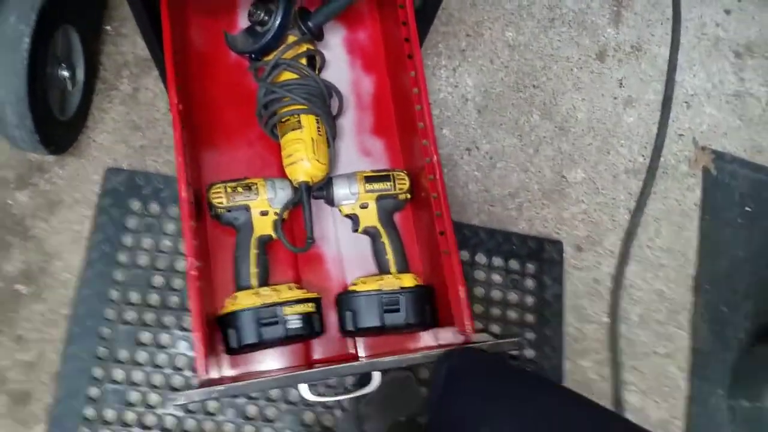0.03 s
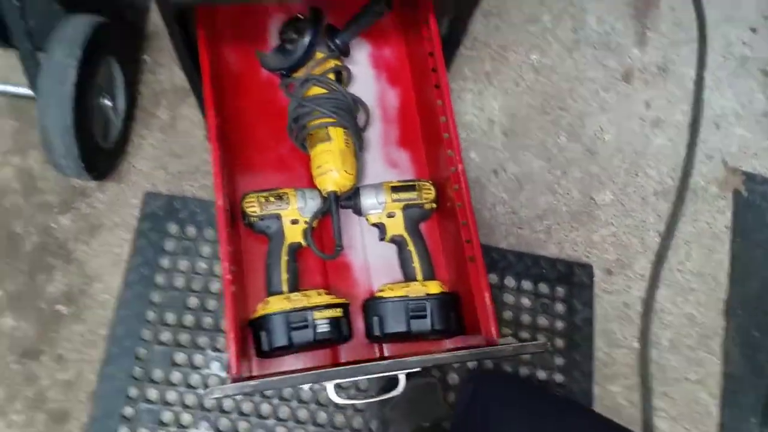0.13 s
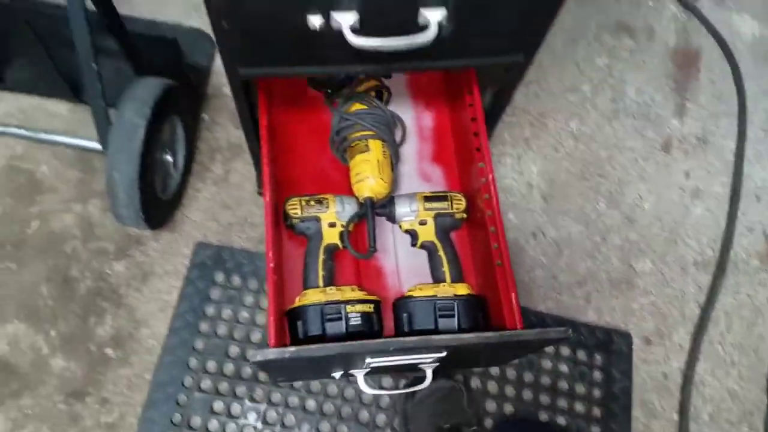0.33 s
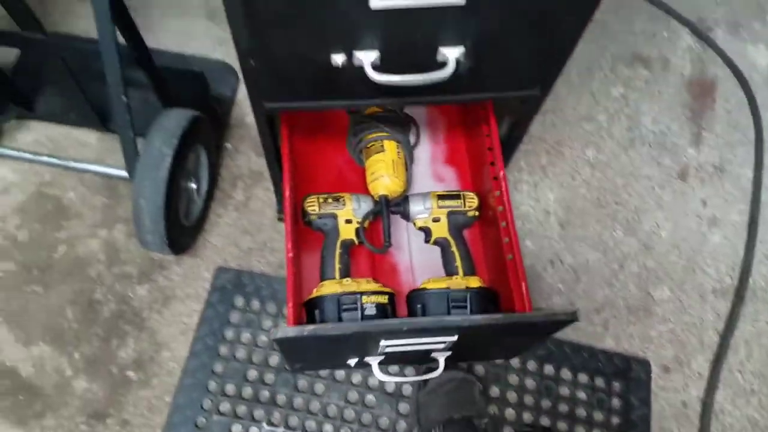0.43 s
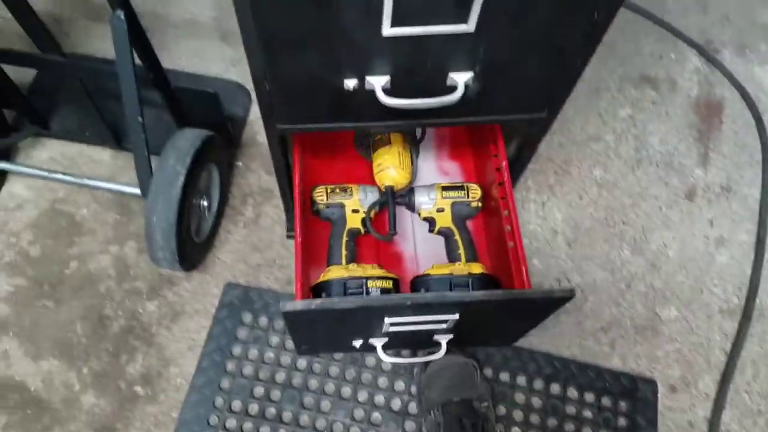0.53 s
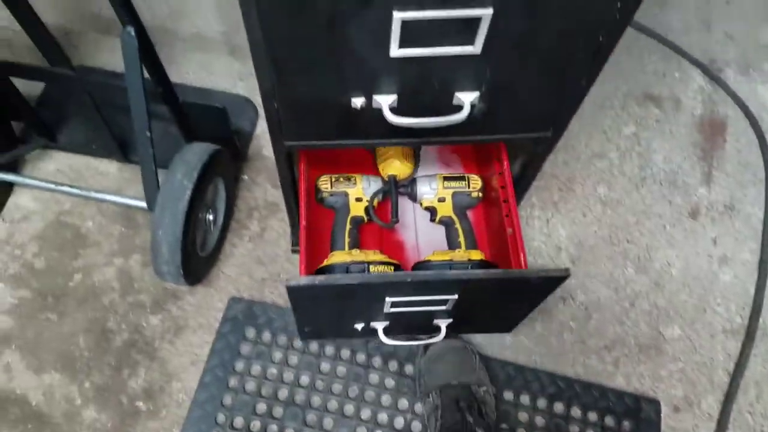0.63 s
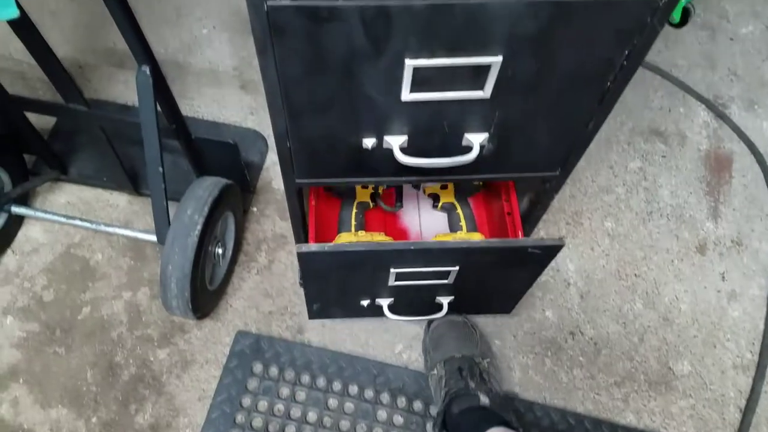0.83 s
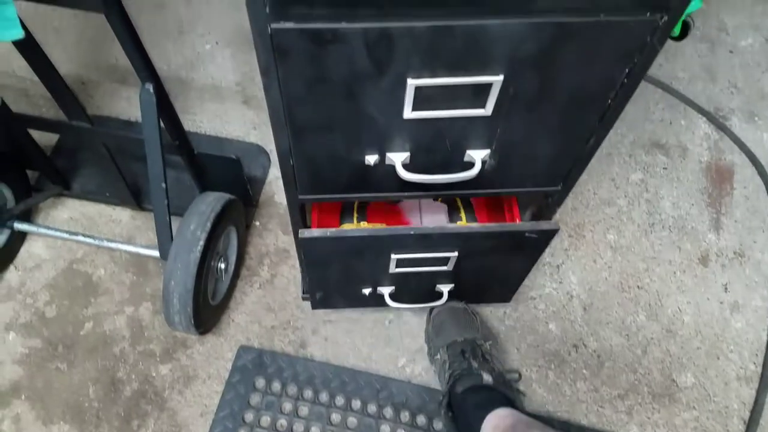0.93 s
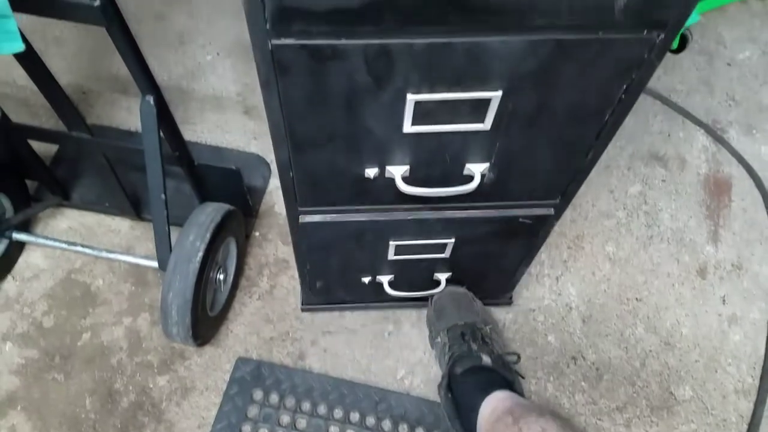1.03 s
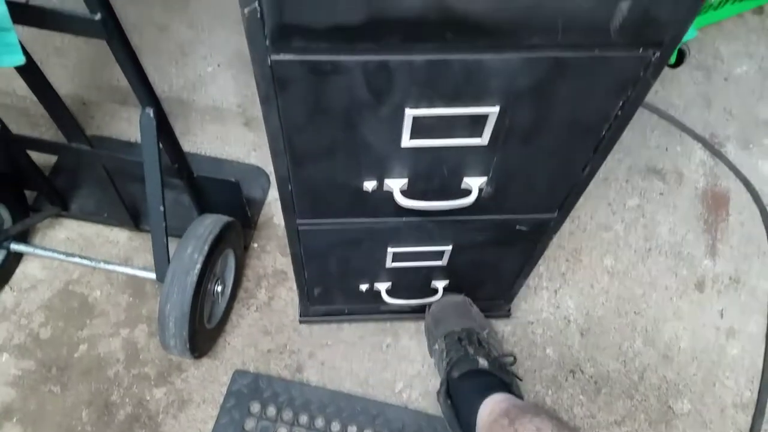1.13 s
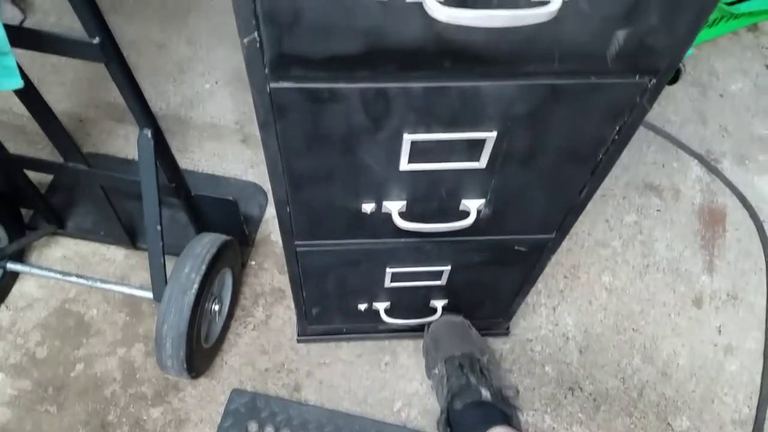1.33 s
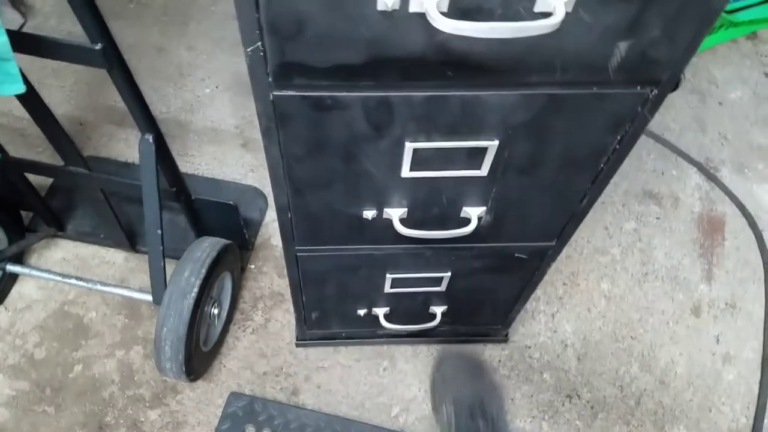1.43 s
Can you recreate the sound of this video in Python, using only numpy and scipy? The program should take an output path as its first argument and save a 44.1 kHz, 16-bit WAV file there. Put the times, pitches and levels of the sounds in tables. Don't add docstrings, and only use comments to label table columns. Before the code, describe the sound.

Heavy metal drawer rolls closed with knocks and tool rattle, then slams with a hollow clang.

```python
import sys
import numpy as np
from scipy import signal
from scipy.fft import rfft, irfft, next_fast_len
from scipy.io import wavfile
from scipy.ndimage import uniform_filter1d

SR = 44100
rng = np.random.default_rng(int(sys.argv[2]) if len(sys.argv) > 2 else 0)


def generate_wav(sig):
    pcm = np.round(np.clip(np.atleast_2d(sig).T, -1, 1) * 32767).astype(np.int16)
    wavfile.write(sys.argv[1], SR, pcm)


def decibels_to_gain(level_db):
    exponent = np.asarray(level_db, float) / 20
    return 10 ** exponent


N = 66150
PADDED = next_fast_len(N + 8192)

# frequency in Hz, level in dB, T60 in seconds.
BODY = [(86, -40, 0.26), (118.2, -7, 0.27), (161, -5.5, 0.075), (183, -4.5, 0.24), (251.2, -8.5, 0.85),
        (264, -6.5, 0.24), (296, -5.5, 0.16), (313, -2.5, 0.077), (395, -2.5, 0.04), (470.3, -5, 0.16),
        (599, -13, 0.15), (761, -4, 0.097)]


def rms_one(x):
    return x / np.sqrt(np.mean(x ** 2) + 1e-20)


def at_hz(points, hz):
    points_hz, values = np.transpose(points)
    return np.interp(np.log(np.maximum(hz, 1)), np.log(points_hz), values)


def colour(x, spectrum):
    gain = decibels_to_gain(at_hz(spectrum, np.fft.rfftfreq(PADDED, 1 / SR)))
    return irfft(rfft(x, PADDED) * rms_one(gain), PADDED)[:N]


def drift(rate_hz):
    r = np.exp(-2 * np.pi * rate_hz / SR)
    wander = signal.lfilter([1], [1, -2 * r, r * r], rng.standard_normal(N + SR))
    return rms_one(wander[SR:])


def ring(x, hz, t60_s):
    r = decibels_to_gain(-60 / (t60_s * SR))
    w = 2 * np.pi * min(hz, SR / 2.1) / SR
    return signal.lfilter([0, np.sin(w)], [1, -2 * r * np.cos(w), r * r], x + 1e-18)


def flex(rows, rise_s):
    out = np.zeros(N)
    for s, db, hz, t60_s in rows:
        a = int(s * SR)
        t = np.arange(min(N - a, int(t60_s * SR))) / SR
        swell = decibels_to_gain(db - 60 * t / t60_s) * (1 - np.exp(-t / rise_s))
        out[a:a + len(t)] += swell * np.sin(2 * np.pi * hz * t)
    return out


def contacts():
    contacts_per_s, spread_db, clump_db = 4000, 2.0, 1.5
    sizes = decibels_to_gain(spread_db * np.minimum(rng.exponential(1, N), 5)) * rng.choice([-1, 1], N)
    clicks = sizes * (rng.random(N) < contacts_per_s / SR)
    return rms_one(clicks * decibels_to_gain(clump_db * drift(23.3)))


def steady(x, window_s=0.09):
    return x / np.sqrt(uniform_filter1d(x ** 2, size=int(window_s * SR)) + .05)


def rolling():
    # time in seconds, vigour in dB, load on the rollers in dB.
    roll = [(0.0, -40, -9), (.15, -40, -1), (.3, -33.5, -4.5), (0.398, -30, -3.5), (.5, -31.5, -3.5),
            (.6, -33, -2.5), (.68, -33.5, -5), (0.758, -37, -13), (.83, -36, 1.5), (.9, -31.5, -22),
            (.96, -27, 0), (1.121, -25, -19)]
    # frequency in Hz, density in dB per Hz.
    panels = [(24, -42), (40, -60), (75, -10.5), (257, -8), (320, -7.5), (764, -12), (1010, -18),
              (2420, -21.5), (5000, -43.5), (6500, -61), (11000, -120)]
    # frequency in Hz, density in dB per Hz.
    grit_spectrum = [(2060, -4), (3500, -4), (5330, -11), (5900, -8.5), (15000, -10.5), (16000, -4)]
    stop_s, stop_db_per_s = 1.1144, 420
    body_db, body_follows, panel_db = -29, 0.6, 6.5
    grit_db, grit_follows = -47.5, 1.65

    t = np.arange(N) / SR
    s, vigour_db, load_db = np.transpose(roll)
    stop = -stop_db_per_s * np.maximum(t - stop_s, 0)
    vigour = np.interp(t, s, vigour_db)
    load = np.interp(t, s, load_db) + stop

    shake = contacts()
    modes = [decibels_to_gain(db) * rms_one(ring(shake + contacts(), hz, t60_s)) for hz, db, t60_s in BODY]
    body = steady(rms_one(sum(modes)))
    out = decibels_to_gain(body_db + body_follows * (vigour + 33) + load) * body
    out = out + decibels_to_gain(panel_db + vigour + stop) * steady(colour(shake, panels))

    scratch = rng.standard_normal(N) * decibels_to_gain(2.0 * drift(51)) + 0.31 * shake
    grit_level = decibels_to_gain(grit_db + grit_follows * (vigour + 36.5) + stop)
    return out + grit_level * colour(scratch, grit_spectrum)


def knocks():
    # start in seconds, peak in dB, body share in dB, sharpness in dB.
    knock_rows = [(0.004, -21, 3.5, 7), (0.089, -21.5, -23, 6.5), (0.162, -29, 17, -9),
                  (0.216, -11, 5.5, -3.5), (0.261, -27, -8, -10), (0.326, -12, -9, 0.5),
                  (0.361, -15.5, -23, 5.5), (0.418, -16, 2.5, -10), (0.456, -11.5, 8.5, -14),
                  (0.526, -15, 12.5, -17), (0.6, -16.5, -5, 6.5), (0.634, -36, -26, -9),
                  (0.662, -36, 3, -18), (0.743, -16.5, 8.5, -9), (0.861, -8, 0, -2), (0.896, -18, 14.5, -3),
                  (0.925, -13.5, -5, 6), (0.948, -7, 1, 2), (0.973, -1, -8, -2), (0.999, -5.5, -7, -3),
                  (1.033, -1, 4, -18), (1.043, -10, -14, 2.5), (1.059, -8.5, -9, 3), (1.097, -13.5, 2, -5),
                  (1.127, -18, 1, 2.5), (1.157, -14.5, 12.5, 1.5), (1.199, -16, 0, -7),
                  (1.247, -23.5, 9.5, -9), (1.29, -28, -14, -4), (1.439, -34, -2, -13)]
    body_gain_db, panel_gain_db, soft_hz = -20.5, -11, 910
    mode_spread_s = 0.00591
    rattle_t60_s, rattle_rise_s = 0.047, 0.0058

    s, db, body_db, sharp_db = np.transpose(knock_rows)
    at = (s * SR).astype(int)
    chance_db = rng.normal(0, 4.3, (len(s), len(BODY)))
    late = (rng.random(chance_db.shape) * mode_spread_s * SR).astype(int)
    body = np.zeros(N)
    for k, (hz, mode_db, t60_s) in enumerate(BODY):
        push = np.zeros(N)
        push[at + late[:, k]] = decibels_to_gain(db + body_db + body_gain_db + mode_db + chance_db[:, k])
        body += ring(push, hz, t60_s * 0.57)
    body = signal.sosfilt(signal.butter(1, soft_hz, fs=SR, output="sos"), body)

    hits = np.zeros(N)
    hits[at] = decibels_to_gain(db + sharp_db + panel_gain_db)
    rise = np.exp(-1 / (rattle_rise_s * SR))
    fall = decibels_to_gain(-60 / (rattle_t60_s * SR))
    swell = signal.lfilter([1 - rise], np.convolve([1, -rise], [1, -fall]), hits)
    rattle = swell * (.5 * contacts() + rng.standard_normal(N))
    return body + colour(rattle, [(150, 11), (600, 9.5), (1100, 6.5), (2500, 6), (4500, -8.0), (16000, -41)])


def slam():
    # start in seconds, level in dB.
    blow_rows = [
        (1.0335, -10),
        (1.0365, -13),
        (1.0415, -6),
        (1.0487, 0),
        (1.0605, -13),
        (1.065, -15),
        (1.101, -17),
    ]
    # frequency in Hz, level in dB, T60 in seconds.
    plate = [(420, -4, .04), (511, -5, .05), (640, -5, .035), (894, -3, .05), (1000, -4, .04),
             (1130, -5, .04), (1432, -9, .05), (1873, -10, .05), (2100, -10, .05)]
    s, db = np.transpose(blow_rows)
    chance_db = rng.normal(0, 1.3, (len(s), len(plate)))
    signs = (-1) ** np.arange(1, len(s) + 1)
    out = np.zeros(N)
    for k, (hz, mode_db, t60_s) in enumerate(plate):
        push = np.zeros(N)
        push[(s * SR).astype(int)] = decibels_to_gain(db + mode_db + chance_db[:, k] - 7) * signs
        out += ring(push, hz, t60_s)
    return signal.sosfilt(signal.butter(2, 2500, fs=SR, output="sos"), out)


def thuds():
    # start in seconds, level in dB, frequency in Hz, T60 in seconds.
    heavy = [
        (.17, -21, 108.7, .2),
        (0.69, -21.5, 187, .25),
        (.36, -26, 95, 0.22),
        (0.47, -24, 118.3, 0.22),
        (.99, -10, 118, 0.28),
        (0.783, -12.5, 121, 0.15),
        (0.898, -12, 108, 0.29),
        (1.1, -24, 84, 0.052),
        (1.201, -7, 87, 0.096),
        (1.437, -34.5, 107, 0.38),
    ]
    # start in seconds, peak in dB, frequency in Hz.
    bumps = [(0.126, -19, 262), (0.163, -21.5, 262), (0.196, -35, 264), (0.232, -24, 229.6),
             (0.254, -19, 275.3), (0.297, -19, 269), (0.347, -27, 252), (0.389, -20, 267),
             (0.421, -17, 269), (0.461, -16, 264), (0.5, -18.5, 227.5), (0.548, -18, 243),
             (0.602, -10, 257.4), (0.629, -17, 264), (0.678, -23, 260), (0.7, -17.5, 280),
             (0.747, -10.5, 274.8), (0.816, -19.5, 297), (0.869, -12.5, 263.5), (0.919, -14, 259),
             (0.948, -17.5, 293), (0.986, -16, 292), (1.033, -20, 228), (1.061, -13.5, 300),
             (1.108, -16.5, 306.2), (1.161, -17.5, 277.6), (1.214, -31, 308)]
    # start in seconds, peak in dB, frequency in Hz.
    sways = [(0.105, -35, 164), (0.155, -24, 186), (0.189, -17.5, 158.5), (0.242, -29, 140),
             (0.302, -22, 140), (0.357, -16, 171), (0.401, -30, 156), (0.455, -27, 166), (0.512, -18, 172),
             (0.564, -14, 181), (0.745, -33, 182), (0.786, -24, 158), (0.851, -19, 171),
             (0.909, -14.5, 190.7), (1.023, -13.5, 187.8), (1.1, -22, 153), (1.237, -29, 139)]
    # start in seconds, level in dB, frequency in Hz, T60 in seconds.
    chimes = [(.475, -20.5, 488, 0.2), (.53, -24, 584.7, .4), (.975, -13.5, 934, 0.12),
              (.99, -17, 595, 0.17), (1.034, -21, 463, 0.13), (1.036, -17, 898.4, 0.19),
              (.943, -11.5, 272, 0.16), (1.054, -14.5, 301.5, 0.19), (1.099, -11, 305.2, .2),
              (1.157, -17, 284.7, 0.18), (1.038, -11, 1110, 0.062), (1.05, -23, 520.6, 0.16),
              (1.1, -19, 337.5, 0.2), (1.115, -16, 397.8, 0.19), (1.04, -29, 2190, .2),
              (1.04, -17, 1427, 0.17)]
    floor_t60_s, wall_t60_s = 0.2, 0.29
    answers = [(s, db - 3, hz, floor_t60_s) for s, db, hz in bumps]
    answers += [(s, db - 6.5, hz, wall_t60_s) for s, db, hz in sways]
    return flex(heavy, rise_s=0.022) + flex(answers, rise_s=0.0031) + flex(chimes, rise_s=0.0065)


def rubs():
    # peak time in seconds, peak in dB, length in seconds, whistle in Hz, whistle level in dB.
    rub_rows = [(0.088, -56.5, 0.038, 14400, -2), (0.168, -47.5, 0.081, 10300, -29),
                (0.28, -45, .03, 15200, -11), (0.328, -44, 0.021, 12200, -25), (0.405, -48, 0.026, 8200, 4),
                (0.407, -44.5, .025, 13500, 5), (0.463, -55, 0.018, 8500, -4),
                (0.533, -35.5, 0.031, 11900, -9.5), (.535, -57, .03, 7700, -7),
                (0.606, -52, 0.023, 13000, 0), (0.89, -61, .02, 6200, -6), (0.948, -50.5, 0.036, 6000, 8.5),
                (1.044, -36, 0.026, 14000, -2), (1.059, -34.5, .03, 12700, -14),
                (1.075, -26, 0.0063, 14800, 2), (1.081, -35, 0.034, 5260, -2)]
    rise_share, whistle_width_hz = 0.43, 700
    t, out = np.arange(N) / SR, np.zeros(N)
    bright = signal.butter(2, 4500, "high", fs=SR, output="sos")
    hiss = rms_one(signal.sosfilt(bright, rng.standard_normal(N) + .5 * contacts()))
    for s, db, length_s, hz, whistle_db in rub_rows:
        a, b = int(max(s - length_s, 0) * SR), int((s + 4 * length_s) * SR)
        u = np.maximum((t[a:b] - s) / (rise_share * length_s) + 1, 0)
        whistle = rms_one(ring(hiss[a:b], hz, 2.2 / whistle_width_hz))
        out[a:b] += decibels_to_gain(db) * u * np.exp(1 - u) * (hiss[a:b] + decibels_to_gain(whistle_db) * whistle)
    return out


def chatter():
    # centre in seconds, rms in dB, length in seconds, frequency in Hz.
    clumps = [(0.338, -42, 0.046, 1470), (0.373, -34.5, 0.05, 2370), (0.415, -31.5, 0.044, 770),
              (0.46, -37, .04, 700), (0.561, -35.5, .04, 2340), (0.57, -30, 0.037, 756),
              (0.603, -37.5, 0.053, 2440), (0.723, -39, 0.046, 2690), (0.783, -35, 0.061, 745),
              (1.044, -28, 0.018, 1010), (1.047, -30.5, 0.018, 1970)]
    ring_cycles = 27
    t, out = np.arange(N) / SR, np.zeros(N)
    clicks = contacts()
    for s, db, length_s, hz in clumps:
        a, b = int((s - 2 * length_s) * SR), int((s + 2 * length_s) * SR)
        swell = decibels_to_gain(db) * np.exp(-2 * ((t[a:b] - s) / length_s) ** 2)
        out[a:b] += swell * rms_one(ring(clicks[a:b], hz, ring_cycles / hz))
    return out


def echoes(t60_points):
    size, out = N // 2, 0
    edges_hz = 40 * 2 ** np.arange(0, 9.1)
    for low, high in zip(edges_hz, edges_hz[1:]):
        octave = signal.butter(2, [low, high], "band", fs=SR, output="sos")
        band = signal.sosfilt(octave, rng.standard_normal(size))
        t60_s = at_hz(t60_points, np.sqrt(low * high))
        out = out + band * decibels_to_gain(-60 * np.arange(size) / SR / t60_s) / np.sqrt(t60_s)
    return out / np.sqrt(np.sum(out ** 2))


def garage(x, tail):
    return x + signal.fftconvolve(x, tail)[:N]


def hum():
    # frequency in Hz, density in dB per Hz.
    hum_spectrum = [(40, 12), (70, -1.5), (280, 0.5), (600, -11.5), (2000, -21), (4500, -40), (9000, -75),
                    (16000, -28)]
    return decibels_to_gain(-42) * colour(rng.standard_normal(N), hum_spectrum)


def ports(shared, own):
    # frequency in Hz, left-right likeness from 0 to 1.
    likeness = [(60, 0.97), (250, 1), (500, 0.92), (1000, 0.86), (2000, 0.04), (5000, 0.1), (15000, 0.027)]
    # frequency in Hz, left minus right in dB.
    sides = [(60, -4), (130, -2.0), (290, -2.5), (640, -3), (1410, -9), (3100, -5), (6820, 5), (15000, 4)]
    left_lead_s = .00009
    hz = np.fft.rfftfreq(PADDED, 1 / SR)
    alike = np.clip(at_hz(likeness, hz), 0, 1)
    side_db = at_hz(sides, hz) / 2
    mid = rfft(shared, PADDED) * np.sqrt((1 + alike) / 2)
    side = rfft(own, PADDED) * np.sqrt((1 - alike) / 2)
    lead = np.exp(2j * np.pi * hz * left_lead_s)
    left = (mid + side) * decibels_to_gain(side_db) * lead
    right = (mid - side) * decibels_to_gain(-side_db)
    return irfft(np.array([left, right]), PADDED)[:, :N]


def scene():
    # frequency in Hz, T60 in seconds.
    room = [(60, 1), (250, 0.55), (1000, 0.41), (3000, 0.23), (8000, 0.26), (15000, 0.24)]
    # frequency in Hz, T60 in seconds.
    far = [(300, 1.0), (3000, 1), (12000, 0.73)]
    room_db, far_db, blow_room_db = -4, -19, -6.5
    parts, blows = [], thuds()
    for _ in (0, 1):
        tail = decibels_to_gain(room_db) * echoes(room) + decibels_to_gain(far_db) * echoes(far)
        moving = garage(rolling() + knocks() + rubs() + chatter(), tail)
        struck = garage(blows + slam(), decibels_to_gain(blow_room_db) * tail)
        parts.append(moving + struck + hum())
    return ports(*parts)


def band_limit(x):
    return signal.sosfilt(signal.butter(12, 16810, fs=SR, output="sos"), x)


def record(dry):
    low_hz, top_hz, clip_top = 75.4, 15770, .97
    x = signal.sosfilt(signal.butter(4, low_hz, "high", fs=SR, output="sos"), dry)
    x = signal.sosfilt(signal.ellip(10, .5, 60, top_hz, fs=SR, output="sos"), x)
    x = x / (1 + (x / clip_top) ** 6) ** (1 / 6)
    return band_limit(x)


dry = scene()
out = record(dry)
generate_wav(out)
```